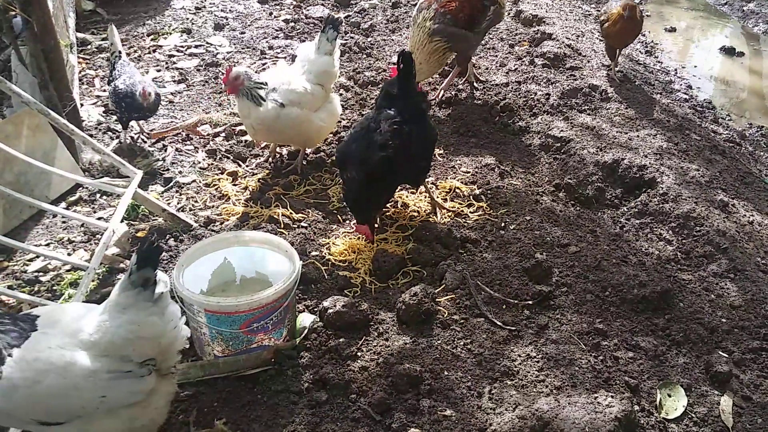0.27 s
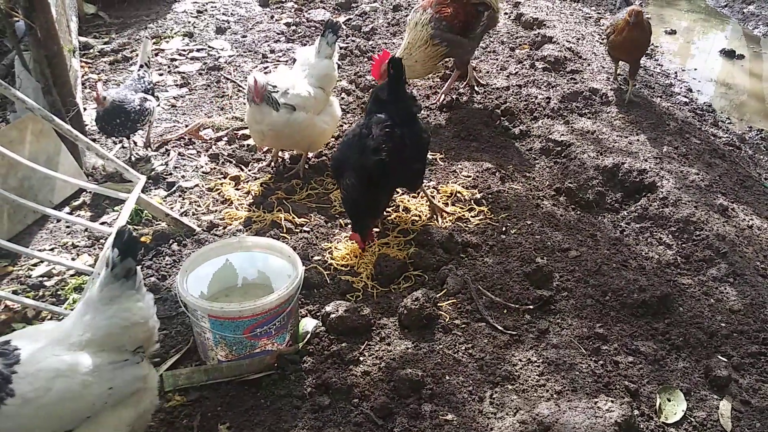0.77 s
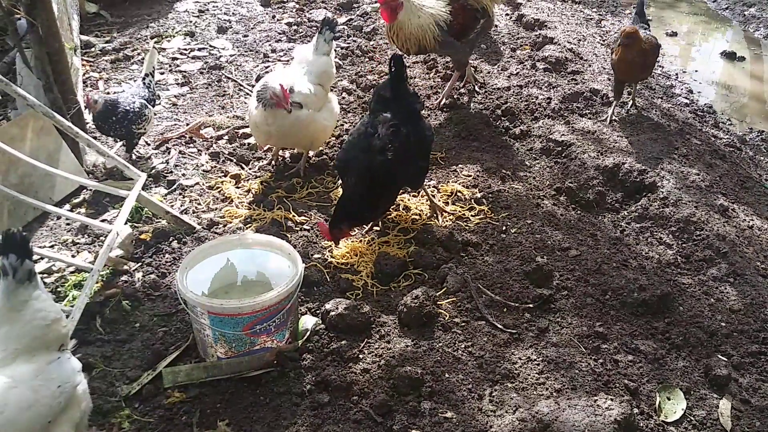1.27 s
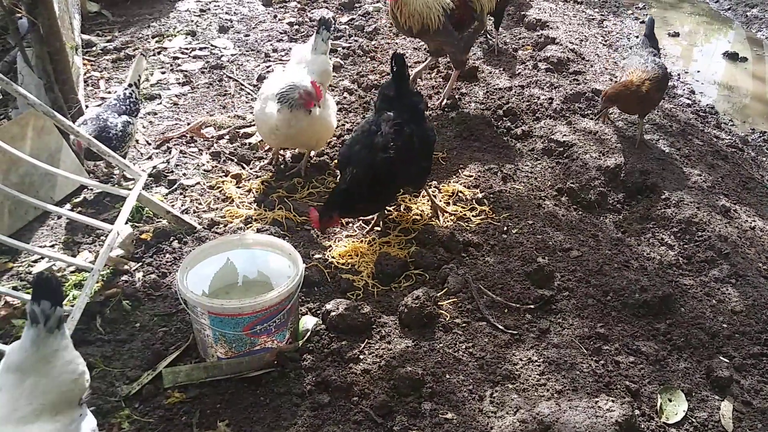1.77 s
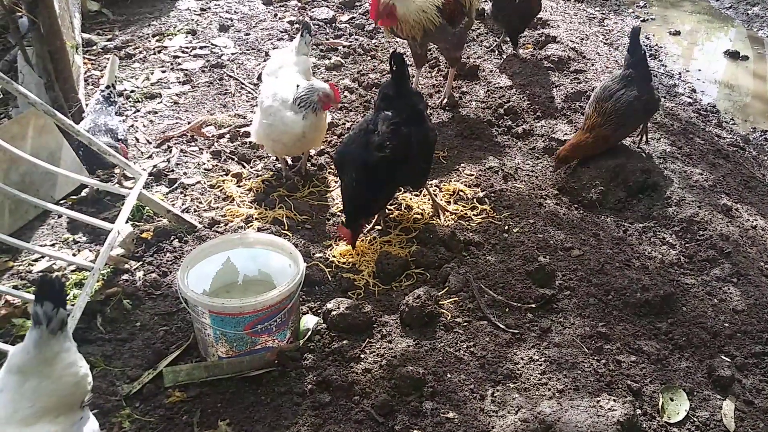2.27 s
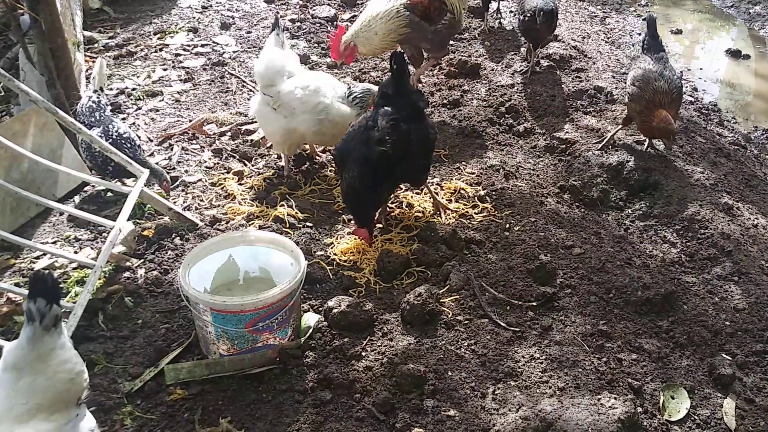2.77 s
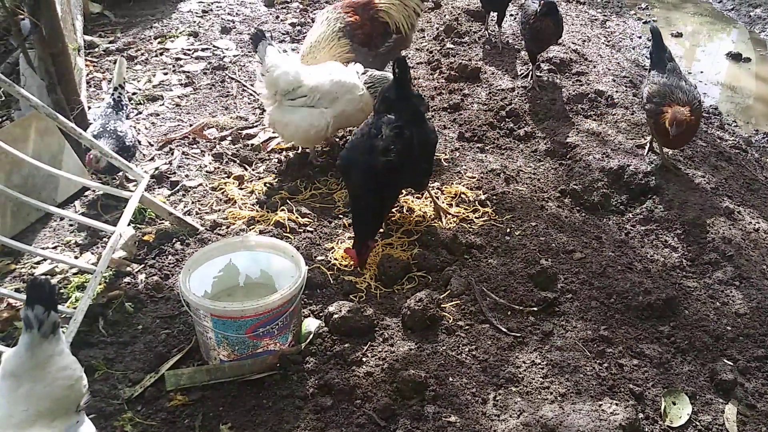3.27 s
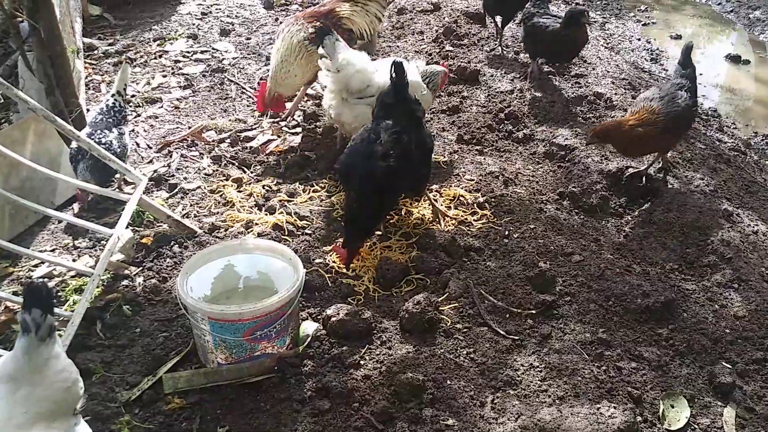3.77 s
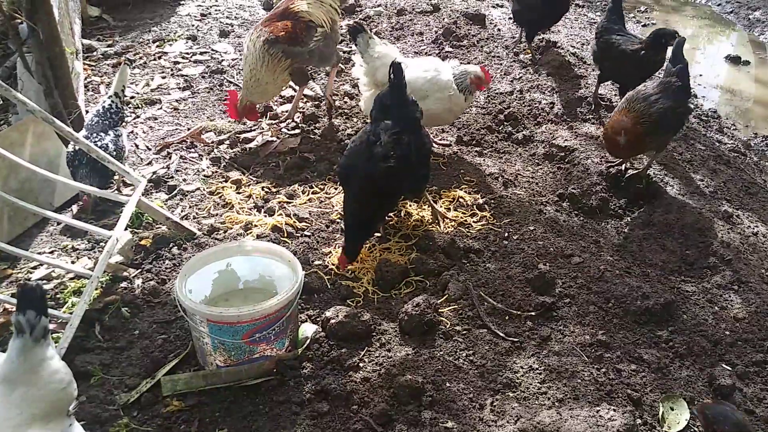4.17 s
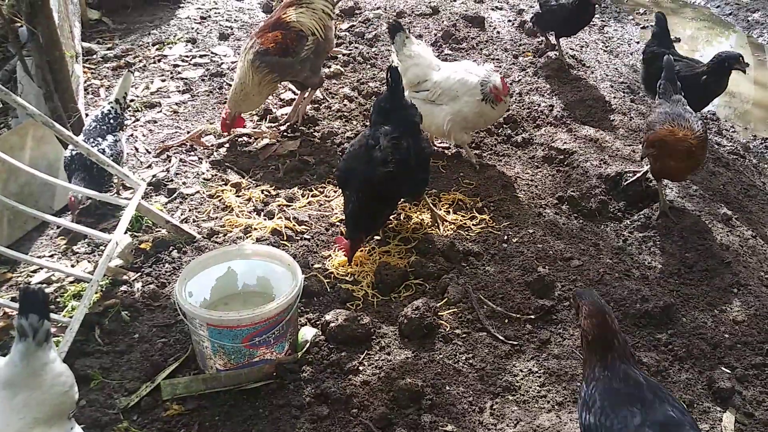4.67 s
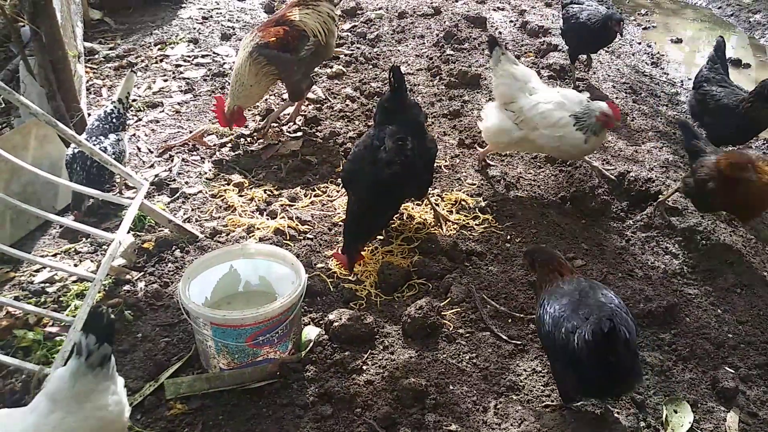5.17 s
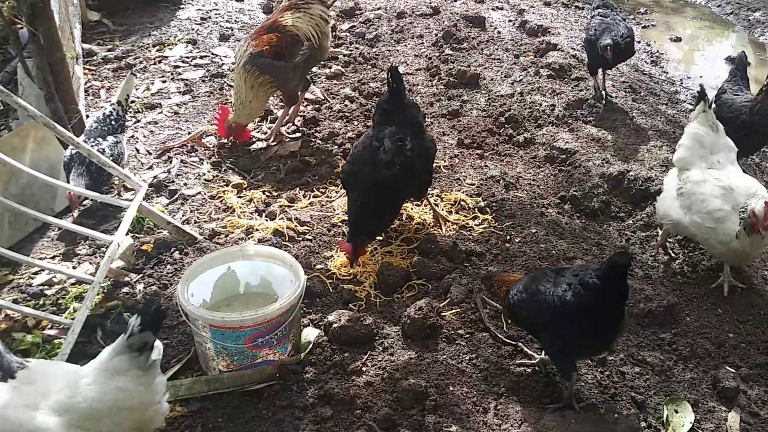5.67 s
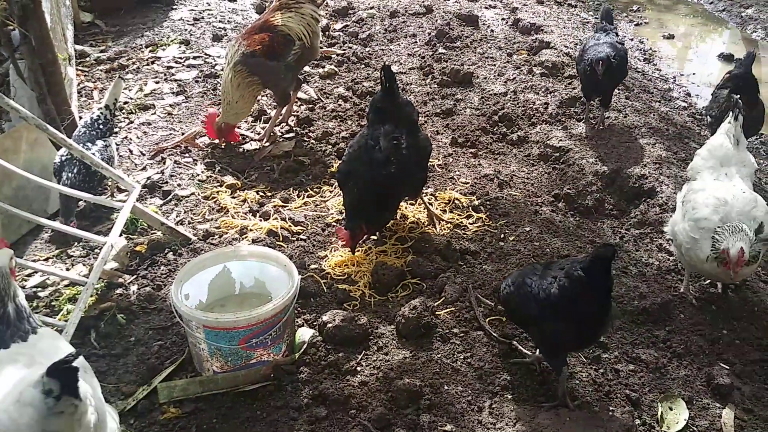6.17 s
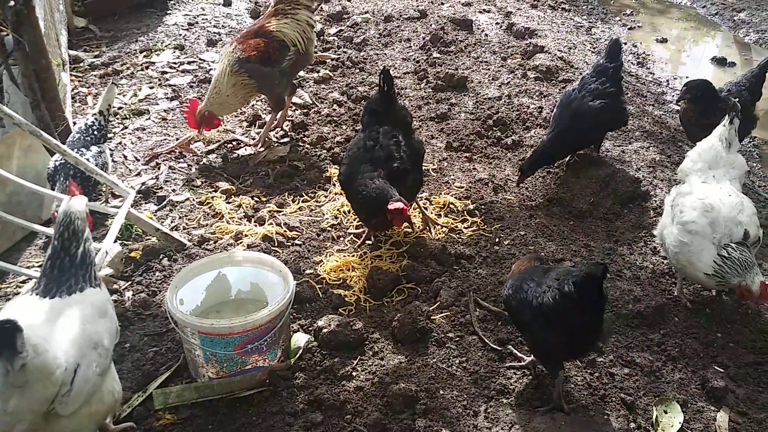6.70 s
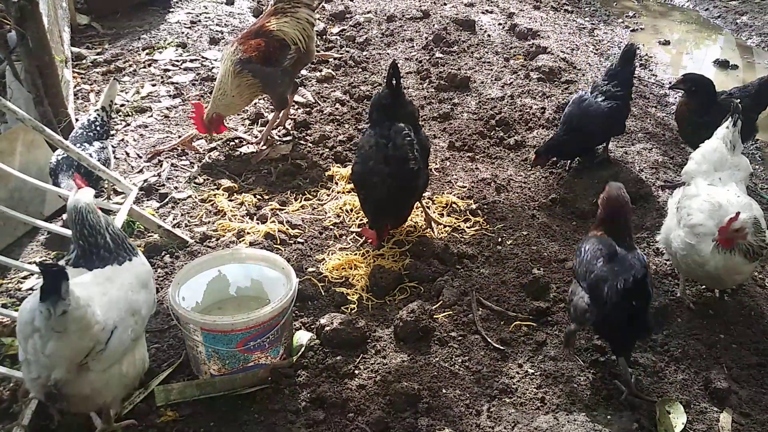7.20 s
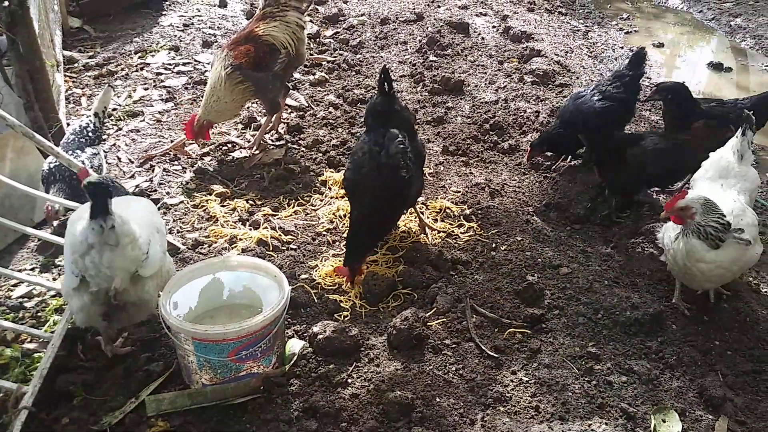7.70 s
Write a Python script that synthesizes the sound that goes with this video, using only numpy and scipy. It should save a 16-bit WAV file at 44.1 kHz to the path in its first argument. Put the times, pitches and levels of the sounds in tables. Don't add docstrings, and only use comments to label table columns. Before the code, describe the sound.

Close to a phone microphone in a muddy yard, a hen gives a quick greeting cluck while others murmur, peck and scratch straw. Sparrows chirp high and bright under an echoing shed roof. Midway the near hen winds up, squawks and cackles, pauses, then quavers into a loud cry, falters and ends with two short barks. A thin wheeze follows, then sparrows over soft wind and hiss.

```python
import sys
import numpy as np
from scipy import signal
from scipy.fft import rfft, irfft, next_fast_len
from scipy.io import wavfile
from scipy.ndimage import uniform_filter1d

SR = 44100
rng = np.random.default_rng(int(sys.argv[2]) if len(sys.argv) > 2 else 0)


def store_pcm(level_fs):
    pcm = np.round(np.clip(level_fs, -1, 1) * 32767).astype(np.int16)
    wavfile.write(sys.argv[1], SR, np.atleast_2d(pcm).T)


def volts_from_decibels(level):
    exponent = np.asarray(level, float) / 20
    return 10 ** exponent


N = 350154
T = np.arange(N) / SR
FAST = next_fast_len(N)

# freq_hz, density_db
YARD_SPECTRUM = [(45, -6.5), (60, -5.5), (150, 0), (250, -5.5), (500, -8), (1000, -9.5), (2000, -11.5),
                 (2800, -19), (4000, -20.5), (5200, -27.5), (7800, -35.5), (9900, -25.5), (12500, -40.5),
                 (15800, -42)]
# time_s, level_db
BREEZE = [(0, -0.5), (1.2, -1.5), (3.2, -3.5), (3.6, -6.5), (5, -7), (7.94, -8.5)]
# loudest_s, freq_hz, width_s, level_db
MOTOR_LINES = [(1.1, 54.5, .7, -50), (3.0, 55, .35, -47), (4.2, 53, .9, -55), (7.3, 51, .6, -58),
               (.3, 79, .55, -50), (3.5, 86, .8, -56), (5.6, 93, 1.5, -55), (.05, 164, .4, -45),
               (5.5, 152, 1.2, -57), (7.7, 156, .6, -47.5), (4, 187.4, 9, -57)]
# start_s, freq_hz, decay_s, level_db
THUDS = [
    (2.449, 96.6, 0.043, -38),
    (3.689, 110.3, 0.015, -36),
]
# freq_hz, gain_db
MIC_RESPONSE = [(30, -30), (48, 0), (5000, 0), (7800, -9), (9800, 7), (12000, -1), (15500, -1)]

# start_s, peak_db, low_share_db
PECKS = [(.087, -44, 3), (.1077, -46, -10), (.1695, -47, -4), (.1735, -48, -8), (.2245, -44, -2),
         (.2349, -39, 2), (.2455, -40, -4), (.2694, -35.5, -14), (.318, -40.5, -15.5), (.3898, -39, -4),
         (.4948, -44, -2), (.6265, -47, -8), (.641, -41, -3), (0.6705, -39, 7), (.675, -46, 0),
         (.7887, -52, -14), (1.0645, -50, -10), (1.975, -49, -10), (1.9839, -43, -20), (1.9957, -33, -25),
         (2.008, -40, -6), (2.021, -47, -2), (2.056, -38, -17), (2.086, -36, -25), (2.106, -49, -16),
         (2.113, -52, -12), (2.6294, -54, -6), (3.445, -55, -12), (3.6451, -49, -12), (4.1985, -55, -12),
         (4.3154, -28, -13), (4.5341, -49, -6), (4.826, -48, -10), (5.249, -46, -3), (5.2939, -43, -15),
         (5.314, -44, -15), (5.521, -46, -12), (5.5802, -48, -10), (5.657, -47, -12), (5.8697, -47, 1),
         (6.501, -45, -13), (6.6398, -50, -14), (6.6662, -41.5, -6), (7.0694, -49, -12), (7.485, -44, -13),
         (7.7952, -56, -7)]
# start_s, length_s, level_db, low_share_db
SCRATCHES = [(0.226, 0.028, -44, -1), (1.08, 0.084, -45.5, -10), (1.45, .11, -56.5, 8),
             (1.604, 0.035, -53.5, 7), (1.665, 0.041, -44.5, 3), (1.774, 0.05, -45, 1),
             (1.987, 0.046, -49, -19), (2.406, 0.069, -59.5, 10), (3.21, 0.062, -51.5, 4),
             (3.492, 0.087, -56, -4), (3.8, 0.055, -49.5, 5), (4.32, .03, -59, -13),
             (4.62, 0.026, -53.5, -4), (4.848, .04, -57, 8.5), (5.27, .2, -58, -9),
             (5.473, 0.035, -51.5, 3), (6.54, .027, -53.5, -15), (7.14, 0.11, -53.5, 5),
             (7.92, 0.015, -45.5, -12)]
# time_s, freq_hz, level_db
WHEEZE_TRACK = [
    (6.649, 10376, -69),
    (6.664, 10750, -63),
    (6.849, 10317, -56),
    (6.874, 10500, -67),
    (6.924, 10650, -62),
    (7.03, 10100, -66),
]

# start_s, length_s, start_hz, end_hz, level_db
MURMURS = [(.47, 0.05, 258, 295, -42), (.59, 0.082, 254, 282, -43.5), (.68, 0.079, 247, 302, -44),
           (.935, .041, 327, 246, -41.5), (1.01, 0.06, 324, 244, -41.5), (2.46, 0.049, 260.6, 308, -40.5),
           (2.55, 0.0725, 268, 314, -40), (2.62, 0.081, 275, 313, -42), (2.905, 0.038, 326, 240, -40.5)]
# start_s, length_s, start_hz, end_hz, level_db
CLUCKS = [
    (.755, 0.11, 424.5, 498, -45.5),
    (2.205, 0.058, 474, 380, -42),
    (2.3, 0.042, 439, 503, -47),
    (2.685, 0.16, 438.6, 496, -44),
    (2.84, 0.019, 527, 620, -45),
    (3.09, 0.045, 446, 580, -50),
    (3.15, 0.075, 462, 414, -45.5),
]
# start_s, length_s, start_hz, end_hz, level_db
YELP = [(.11, .055, 331, 314, -42)]
CROAK = [(3.899, 0.029, 995, 992, -28.5)]

# start_s, length_s, top_hz, level_db
CHEEPS = [(.385, 0.069, 5040, -29), (1.5, 0.083, 5110, -28), (2.16, 0.065, 4850, -26.5),
          (2.428, 0.088, 4920, -28), (3.222, 0.063, 4840, -28), (3.825, 0.074, 4890, -22.5),
          (4.872, 0.086, 5100, -29), (6.032, 0.083, 5040, -30.5)]
TAILS = [(.455, 0.037, 3944, -30), (.645, 0.0394, 4360, -39.5), (1.578, 0.045, 4030, -30),
         (1.78, .04, 3400, -41), (2.503, 0.048, 4050, -31), (3.895, 0.056, 4000, -30),
         (4.95, .045, 3980, -32.5), (6.108, 0.061, 3944, -34.5), (6.5, 0.019, 3780, -45),
         (7.278, .05, 3900, -33)]
DROPS = [
    (2.198, .06, 4150, -26),
    (3.256, .055, 4200, -25.5),
    (4.53, .084, 4800, -52),
]
SLIDES = [(1.094, 0.14, 5493, -26), (3.486, 0.145, 5400, -27), (4.955, .16, 5440, -28.5),
          (7.142, 0.15, 5420, -27)]
LEADS = [(1.088, 0.029, 6530, -37), (1.61, .04, 6300, -47), (1.675, 0.043, 5800, -37),
         (1.785, 0.054, 6800, -39), (1.805, .02, 4800, -42), (2.148, .022, 6120, -28),
         (2.408, .03, 5500, -41), (2.43, 0.026, 6200, -42), (3.205, 0.048, 5970, -33),
         (3.49, .04, 6300, -44), (3.79, .066, 5970, -36), (4.85, .043, 6380, -42), (6.02, 0.035, 6400, -40),
         (7.13, .03, 5630, -43), (7.635, 0.036, 6050, -46)]
WHISTLE = [(7.655, 0.088, 5100, -41.5)]
NEAR_SLIDE = [(5.079, 0.102, 6170, -28)]
NEAR_LEAD = [(4.879, .024, 4750, -33), (7.914, .05, 5530, -44)]
NOTE_SHAPES = {"cheep": (.75, .74), "tail": (.9, .88), "drop": (1.0, .78), "slide": (.82, .6),
               "fall": (.8, .58), "lead": (.92, .93), "dive": (1.005, .48), "rise": (.99, 1.065)}

# time_s, pitch_hz, effort_db, beak_opening_db
GREETING = [
    [(.01, 609, -51, -6), (.038, 585, -41, -15), (.092, 551, -54, -13), (.11, 616, -64, -8)],
    [(.245, 559, -49, -7), (.257, 517, -31, -10), (.273, 545.5, -36.5, -24), (.297, 520, -23, -13),
     (.307, 550, -27, -22), (.319, 526.6, -41, -20), (.359, 506, -48, -12)],
]
WIND_UP = [(3.537, 569, -42, 1), (3.546, 550.5, -37.5, -25), (3.615, 544, -25.5, -24),
           (3.683, 602, -25.5, -26), (3.711, 550, -19.5, -20), (3.723, 547, -20.5, -25),
           (3.741, 674, -37.5, -11)]
SQUAWK = [(3.758, 606, -22, -27), (3.769, 530, -17.5, -7.5), (3.813, 533, -21.5, -23),
          (3.845, 539, -18.5, -14.5), (3.88, 537, -18, -6.5), (3.888, 561, -18, -23),
          (3.9, 561.3, -38, -15)]
CACKLE = [
    [(3.928, 655, -45, -13), (3.936, 643, -25, -17), (3.945, 566, -13, -13.5), (3.956, 588, -19, -14),
     (3.973, 658, -18, -42), (3.981, 733, -49, -11), (3.991, 765, -27, -24), (4.001, 687, -46, -6)],
    [(4.009, 666, -23, -27), (4.019, 621, -15.5, -28), (4.031, 623, -13.5, -24), (4.043, 645, -19, -34),
     (4.052, 669, -32, -38), (4.058, 700, -40, -16), (4.067, 764, -30, -30), (4.08, 706, -40, -17),
     (4.091, 775, -27.5, -25)],
    [(4.098, 711, -39, -21), (4.105, 612, -15, -18), (4.113, 579.7, -13.5, -8.5), (4.123, 613, -13.5, -20),
     (4.133, 663, -19, -40), (4.142, 699, -44, -6), (4.157, 685, -38, -16), (4.171, 727, -40, -18),
     (4.18, 696, -56, -19)],
]
QUAVER = [(4.955, 554, -59, -13), (4.965, 545, -29, -28), (5.02, 578.4, -26, -18),
          (5.037, 590.4, -19.5, -7.5), (5.06, 599, -26.5, -25.5), (5.129, 609.5, -24.5, -20),
          (5.228, 602.4, -19.5, -21), (5.253, 579, -25, -15)]
CRY = [(5.282, 609, -16, -25), (5.316, 621, -15, -26), (5.352, 638.3, -10.5, -23.5),
       (5.39, 628, -11.5, -19.5), (5.403, 614, -17, -17), (5.408, 630, -11, -22), (5.426, 602, -19.5, -13)]
FALTER = [(5.436, 604, -14.5, -8), (5.466, 607, -13.5, -12.5), (5.487, 607, -13.5, -16),
          (5.506, 591.5, -25, -1.5), (5.528, 570, -29, -8), (5.558, 575, -22.5, -17),
          (5.594, 565.6, -23.5, -9.5), (5.615, 553, -27.5, -12)]
KICK = [
    (5.627, 643.5, -21.5, -20.5),
    (5.668, 632, -24.5, -23),
    (5.684, 650, -31, -28),
    (5.697, 690, -47, -8),
]
BARKS = [
    [(5.79, 547, -24, -25), (5.796, 523.4, -32, -13), (5.82, 559, -26, -17), (5.842, 559, -19.5, -11),
     (5.85, 570, -21.5, -15), (5.858, 553.4, -58, -4)],
    [(5.97, 561, -30, -3.5), (5.986, 562, -27.5, -14.5), (6.002, 590.5, -34.5, -7),
     (6.018, 570.5, -19.5, -30), (6.032, 588, -30, -8)],
]
# freq_hz, gain_db
THROAT = [(2000, -12), (3000, -12.5), (3500, -10.5), (3900, -2), (4280, -7), (4600, -33), (6200, -21.5),
          (7400, -25), (9000, -27), (12000, -39.5), (15500, -39.5)]
# time_s, gain_db
NECK_STRETCH = [(.3, 1.5), (3.6, -3), (3.8, 0), (3.88, 3.5), (3.95, -0.5), (4.03, 1.5), (4.115, 0.5),
                (5.0, -5), (5.23, -8), (5.28, 0), (5.35, 0.5), (5.46, -6.5), (5.53, 11), (5.6, 5),
                (5.66, 3), (5.84, 5), (6.0, 7)]
# start_s, length_s, level_db
RASPS = [
    (3.88, 0.021, -33),
    (5.687, 0.028, -42),
    (5.775, 0.024, -30.5),
    (5.956, 0.021, -31),
]


def unit(x):
    return x / np.sqrt(np.mean(x ** 2))


def colour(x, points):
    hz, db = np.transpose(points)
    f = np.fft.rfftfreq(FAST, 1 / SR) + 1
    gain = volts_from_decibels(np.interp(np.log(f), np.log(hz), db))
    return irfft(rfft(x, FAST) * gain, FAST)[:N]


def band(x, lo_hz, hi_hz):
    return signal.sosfilt(signal.butter(2, [lo_hz, hi_hz], "band", fs=SR, output="sos"), x)


def walk(rate_hz, size=N):
    hold = int(SR / rate_hz)
    steps = np.repeat(rng.standard_normal(size // hold + 1), hold)
    return 1.47 * uniform_filter1d(uniform_filter1d(steps, hold), hold)[:size]


def add(out, start_s, x):
    i = int(start_s * SR)
    out[i:i + len(x)] += x[:N - i]


def echoes(x, t60_s, wet_db, near_t60_s, near_db, dry_db):
    t, answer = T[:SR], np.zeros(SR)
    for decay_s, db in ((near_t60_s, near_db), (t60_s, wet_db)):
        tail = rng.standard_normal(SR) * np.exp(-np.log(1000) * t / decay_s)
        answer += volts_from_decibels(db) * tail / np.sqrt(np.sum(tail ** 2))
    return volts_from_decibels(dry_db) * x + signal.oaconvolve(x, answer)[:N]


def yard():
    air_hz, air_db, breeze_share = (110, 900, 7000), (-42.5, -37.5, -41), (0.39, 0.97, 0.53)
    breeze_db = np.interp(T, *np.transpose(BREEZE))
    hiss = rfft(unit(colour(rng.standard_normal(N), YARD_SPECTRUM)), FAST)
    f = np.fft.rfftfreq(FAST, 1 / SR)
    out = np.zeros(N)
    for hz in 40 * 2 ** np.arange(0, 9, .5):
        part = irfft(hiss * (f >= hz) * (f < hz * np.sqrt(2)), FAST)[:N]
        db = np.interp(np.log(hz), np.log(air_hz), air_db)
        share = np.interp(np.log(hz), np.log(air_hz), breeze_share)
        out += part * volts_from_decibels(db + share * breeze_db + 1.15 * walk(9))
    return out


def motor():
    out = np.zeros(N)
    waver, swell = 1 + 0.01228 * walk(6.8), volts_from_decibels(1.23 * walk(6.3))
    for k, (loudest_s, hz, width_s, db) in enumerate(MOTOR_LINES):
        near = np.abs(T - loudest_s) < 3 * width_s
        phase = 2 * np.pi * np.cumsum(hz * np.roll(waver, k * SR)[near]) / SR
        bell = np.exp(-.5 * ((T[near] - loudest_s) / width_s) ** 2)
        out[near] += np.sqrt(2) * volts_from_decibels(db) * np.roll(swell, k * SR)[near] * bell * np.sin(phase)
    return out


def thuds():
    out, t = np.zeros(N), T[:SR // 4]
    for start_s, hz, decay_s, db in THUDS:
        swell = (t / decay_s) * np.exp(1 - t / decay_s)
        add(out, start_s, volts_from_decibels(db) * swell * np.sin(2 * np.pi * hz * t))
    return out


def feeding():
    high, low, t = np.zeros(N), np.zeros(N), T[:int(.03 * SR)]
    for start_s, db, low_db in PECKS:
        ring = np.minimum(t / 0.00056, 1) * np.exp(-t / 0.0016) + 0.22 * np.exp(-t / 0.019)
        crack = volts_from_decibels(db - 0.5) * ring
        add(high, start_s, crack)
        add(low, start_s, crack * volts_from_decibels(low_db))
    grains = volts_from_decibels(3.5 * walk(440))
    for start_s, length_s, db, low_db in SCRATCHES:
        u = np.linspace(0, 1.8, int(2.4 * length_s * SR))
        stroke = np.minimum(u / 0.16, 1) * np.exp(-u ** 2)
        rake = volts_from_decibels(db) * stroke * np.roll(grains, -int(start_s * SR))[:len(u)]
        add(high, start_s, rake)
        add(low, start_s, rake * volts_from_decibels(low_db))
    bright = [(5500, -6.0), (7800, -7.5), (9800, 9.0), (11800, -5.0), (15600, -14)]
    high_noise = unit(colour(rng.standard_normal(N), bright))
    low_noise = unit(band(rng.standard_normal(N), 2500, 6300))
    return high * high_noise + low * low_noise


def wheeze():
    s, hz, db = np.transpose(WHEEZE_TRACK)
    phase = 2 * np.pi * np.cumsum(np.interp(T, s, hz) * (1 + 0.011 * walk(96))) / SR
    level = volts_from_decibels(np.interp(T, s, db, left=-120, right=-120) + 3.8 * walk(30))
    return level * (np.sqrt(2) * np.sin(phase) + volts_from_decibels(-20) * np.sin(1.2 * phase))


def flock(tables, jitter, weak_db):
    rising_db_per_octave = 12
    out, wobble, swell = np.zeros(N), 1 + jitter * walk(60), volts_from_decibels(0.92 * walk(40.4))
    for table, first, top_db in tables:
        for start_s, length_s, start_hz, end_hz, main_db in table:
            upper_db = main_db + top_db + rising_db_per_octave * np.log2(end_hz / start_hz)
            i, size = int(start_s * SR), int(length_s * SR)
            hz = np.linspace(start_hz, end_hz, size) * wobble[i:i + size]
            phase = 2 * np.pi * np.cumsum(hz) / SR
            note = volts_from_decibels(main_db) * (np.sin(first * phase) + volts_from_decibels(weak_db) * np.sin((first - 1) * phase))
            note += volts_from_decibels(upper_db) * np.sin((first + 1) * phase)
            add(out, start_s, np.sqrt(2) * note * np.hanning(size) ** .2)
    return out * swell * volts_from_decibels(3.5)


def notes(table, kind):
    start, end = NOTE_SHAPES[kind]
    return [(s, length_s, start * hz, hz, end * hz, db) for s, length_s, hz, db in table]


def sparrow(table, turn, warble_hz, warble, overtone_db, third_db, fade=3):
    sag = .54
    out = np.zeros(N)
    shake = np.sin(2 * np.pi * np.cumsum(warble_hz * (1 + 0.23 * walk(90))) / SR)
    for start_s, length_s, start_hz, top_hz, end_hz, db in table:
        u = np.linspace(0, 1, int(min(length_s, T[-1] - start_s) * SR))
        path_hz = [start_hz, top_hz, top_hz - sag * (top_hz - end_hz), end_hz]
        hz = np.interp(u, [0, turn, (1 + turn) / 2, 1], path_hz)
        hz = uniform_filter1d(hz, int(0.0034 * SR))
        hz = hz * (1 - warble * (1 + shake[int(start_s * SR):][:len(u)]))
        phase = 2 * np.pi * np.cumsum(hz) / SR
        beak = 1 + 0.75 / (1 + ((hz - 3800) / 300) ** 2)
        swell = np.minimum(u / .22, 1) * np.minimum((1 - u) / 0.53, 1)
        overtones = volts_from_decibels(overtone_db) * np.sin(2 * phase) + volts_from_decibels(third_db) * np.sin(3 * phase)
        overtones = overtones * (hz / top_hz) ** fade
        add(out, start_s, volts_from_decibels(db) * swell * (beak * np.sin(phase) + overtones))
    return out * volts_from_decibels(3.6 * walk(260))


def roof_sparrows():
    wall_s, wall_db = .065, -13
    chirps = sparrow(notes(SLIDES, "slide"), turn=.15, warble_hz=210, warble=.085,
                     overtone_db=-20, third_db=-28)
    clear = notes(CHEEPS, "cheep") + notes(LEADS, "lead")
    chirps += volts_from_decibels(-3.5) * sparrow(clear, turn=.27, warble_hz=205, warble=.04,
                                  overtone_db=-24, third_db=-32)
    falling = notes(TAILS, "tail") + notes(DROPS, "drop")
    chirps += sparrow(falling, turn=.3, warble_hz=230, warble=.055, overtone_db=-22, third_db=-32)
    chirps += sparrow(notes(WHISTLE, "fall"), turn=.27, warble_hz=190, warble=.012,
                      overtone_db=-24, third_db=-34)
    return chirps + volts_from_decibels(wall_db) * np.roll(chirps, int(wall_s * SR))


def near_sparrow():
    close = notes(NEAR_SLIDE, "dive") + notes(NEAR_LEAD, "rise")
    return sparrow(close, turn=.05, warble_hz=201, warble=.03, overtone_db=-7.5, third_db=-36, fade=1.2)


def rasps():
    bursts = np.zeros(N)
    for start_s, length_s, db in RASPS:
        add(bursts, start_s, volts_from_decibels(db) * np.hanning(int(length_s * SR)) ** .5)
    low_throat = [(300, -38), (650, 24.0), (1100, 11.0), (1900, 7), (4000, -10), (9000, -22.0)]
    return bursts * unit(colour(rng.standard_normal(N), low_throat))


def shaken(hz, t):
    start_s, end_s, shake_hz, depth_hz, decay_s = 5.049, 5.225, 19.3, 55, .14
    since = np.clip(t - start_s, 0, end_s - start_s)
    shake = np.exp(-since / decay_s) * np.sin(2 * np.pi * shake_hz * since)
    return hz + depth_hz * shake * (t < end_s)


def hen(blur, bright_db, jitter, flutter_db):
    long_call = QUAVER + CRY + FALTER + KICK
    calls = GREETING + [WIND_UP + SQUAWK, sum(CACKLE, []), long_call] + BARKS
    s, *columns = np.transpose(sorted(row for table in calls for row in table))
    gate = sum(1. * (T >= table[0][0]) * (T < table[-1][0]) for table in calls)
    gate = uniform_filter1d(np.minimum(gate, 1), int(0.0037 * SR))
    on = gate > 0
    t = T[on]
    hz, db, open_db = (np.interp(t, s, c) for c in columns)
    hz = shaken(hz, t)
    first_db = -22 + 0.36 * db + 0.0513 * (hz - 600) - .14 * np.maximum(hz - 695, 0)
    first_db = first_db - 3 * (t < 1)
    third_db = db + open_db
    phase = 2 * np.pi * np.cumsum(hz * (1 + jitter * walk(150)[on])) / SR
    voice = np.zeros(len(t))
    for k, partial_db in enumerate((first_db, db, third_db), 1):
        voice += volts_from_decibels(partial_db + 0.16 * flutter_db * walk(55.3, size=len(t))) * np.sin(k * phase)
    effort_db = .23 * first_db + .45 * db + .5 * third_db - .06 * np.maximum(hz - 630, 0) + bright_db
    effort_db = effort_db + np.interp(t, *np.transpose(NECK_STRETCH))
    throat_hz, throat_db = np.transpose(THROAT)
    for k in np.arange(4, 25):
        shape_db = np.interp(k * hz, throat_hz, throat_db) + flutter_db * walk(38.09, size=len(t))
        blurred = k * phase + blur * k * walk(120, size=len(t))
        voice += volts_from_decibels(effort_db + shape_db) * np.sin(blurred)
    out = np.zeros(N)
    out[on] = np.sqrt(2) * voice * gate[on]
    return out


def scene():
    background = yard() + motor() + thuds()
    ground = echoes(feeding() + wheeze(), t60_s=.3, wet_db=-13, near_t60_s=.05, near_db=-8, dry_db=0)
    murmurs = flock([(MURMURS, 2, -13), (CLUCKS, 1, -10)], jitter=0.012, weak_db=-8)
    roof = echoes(roof_sparrows() + volts_from_decibels(-7) * murmurs, t60_s=.72, wet_db=-10.5,
                  near_t60_s=.11, near_db=-4.5, dry_db=-5)
    fence = echoes(near_sparrow(), t60_s=.54, wet_db=-10, near_t60_s=.2, near_db=-11, dry_db=-2)
    near_hen = hen(blur=.15, bright_db=-9, jitter=.003, flutter_db=4) + rasps()
    near_hen += flock([(YELP, 2, 9), (CROAK, 1, -40)], jitter=0.01, weak_db=-13.5)
    near_hen = echoes(near_hen, t60_s=.45, wet_db=-18, near_t60_s=.06, near_db=-12, dry_db=0)
    birds = colour(near_hen + volts_from_decibels(-4.0) * murmurs + roof + fence, MIC_RESPONSE)
    return (birds + ground + background)[None]


def band_limit(x):
    return signal.sosfilt(signal.butter(12, 16540, fs=SR, output="sos"), x)


def record(dry):
    top_cut = signal.ellip(10, .2, 60, 15830, fs=SR, output="sos")
    mix = signal.sosfilt(top_cut, dry)
    return band_limit(mix)


dry = scene()
out = record(dry)
store_pcm(out)
```